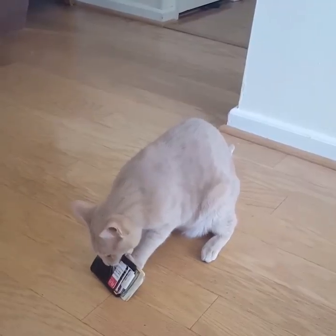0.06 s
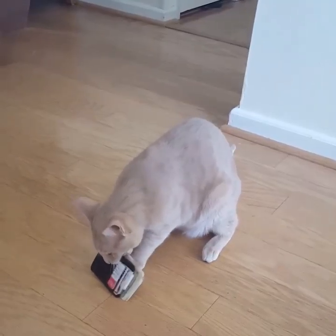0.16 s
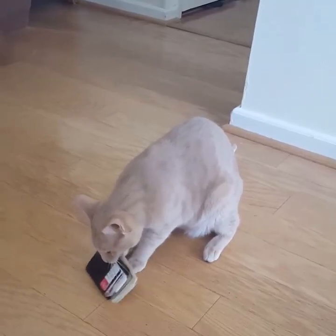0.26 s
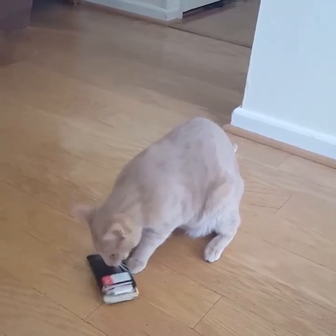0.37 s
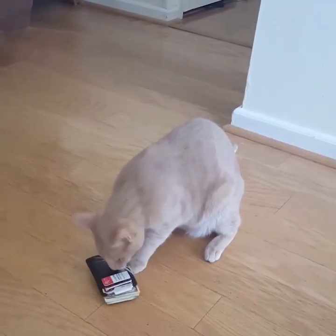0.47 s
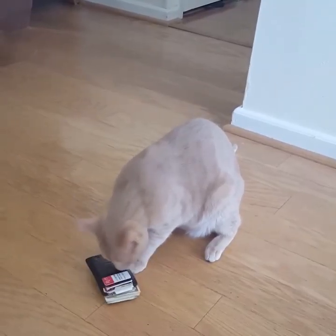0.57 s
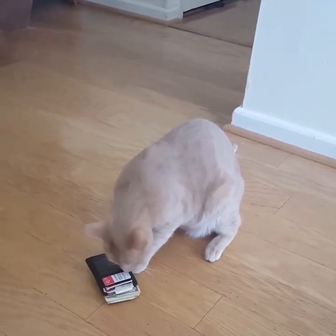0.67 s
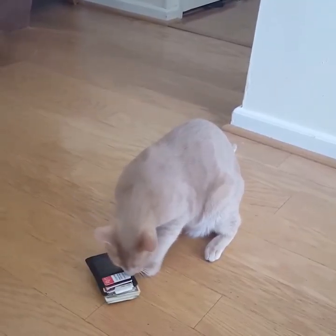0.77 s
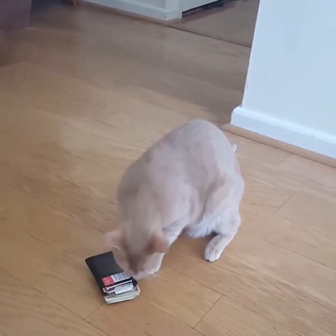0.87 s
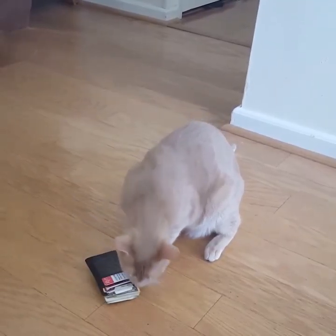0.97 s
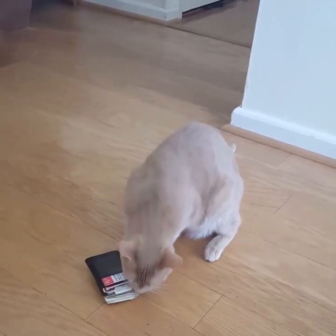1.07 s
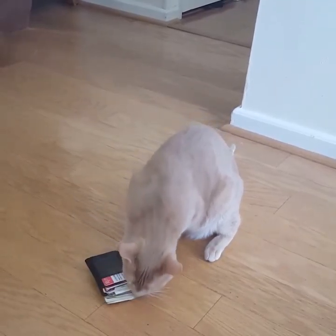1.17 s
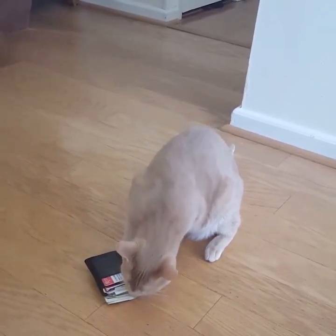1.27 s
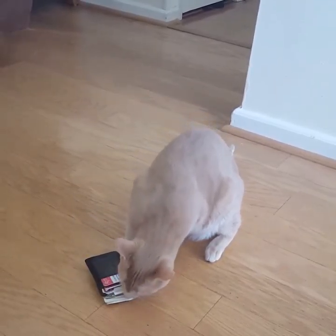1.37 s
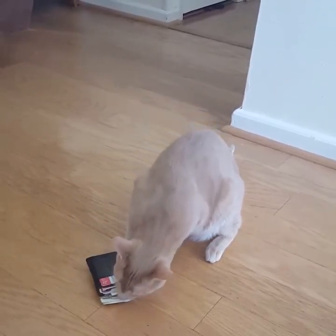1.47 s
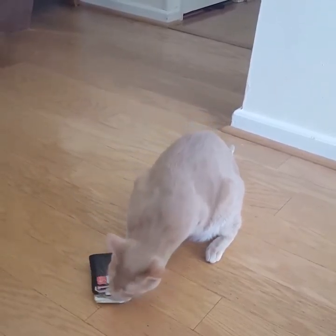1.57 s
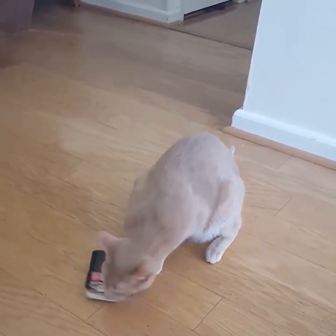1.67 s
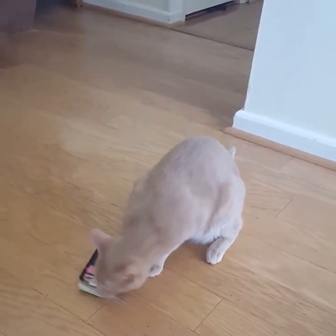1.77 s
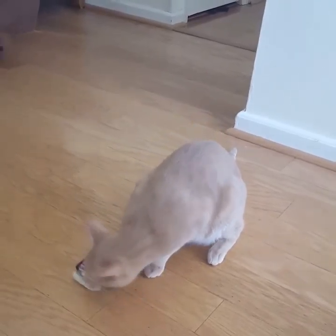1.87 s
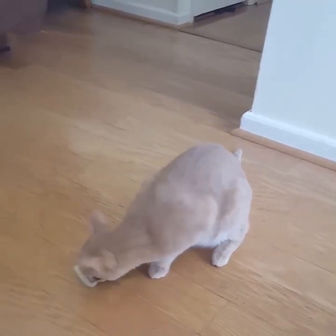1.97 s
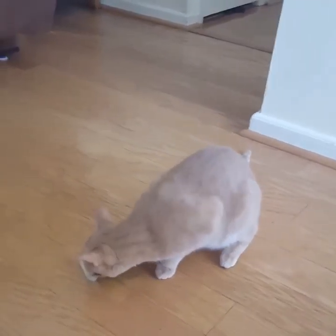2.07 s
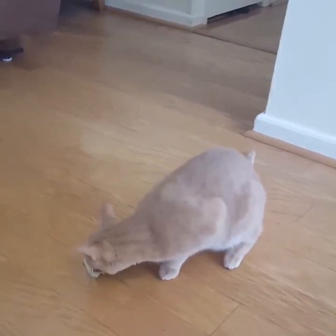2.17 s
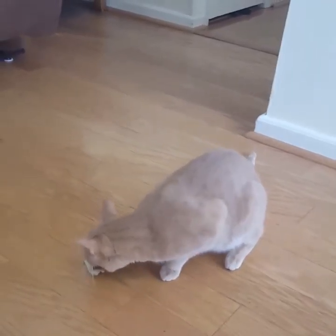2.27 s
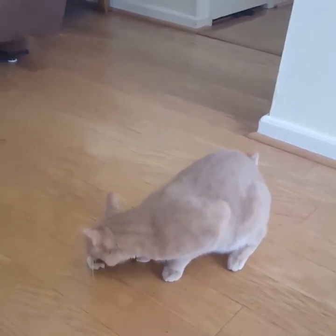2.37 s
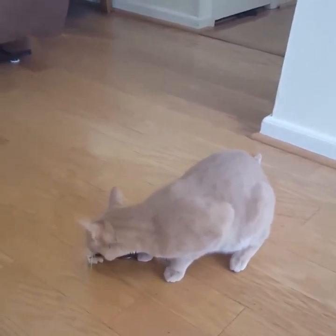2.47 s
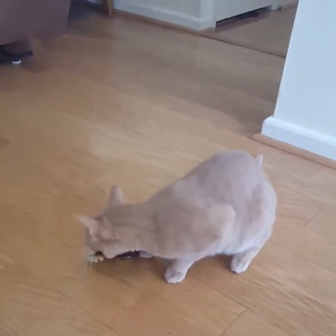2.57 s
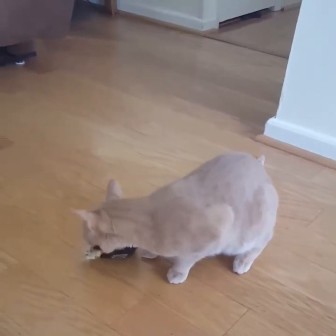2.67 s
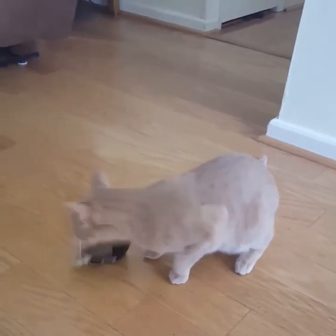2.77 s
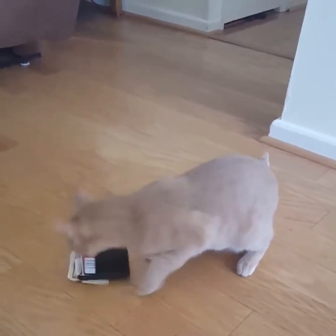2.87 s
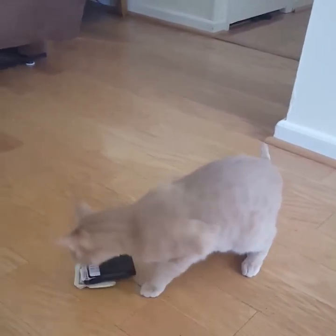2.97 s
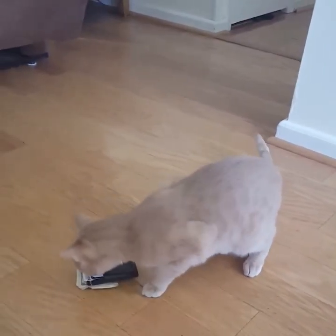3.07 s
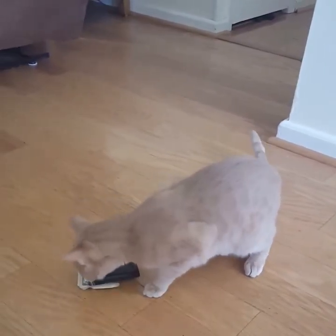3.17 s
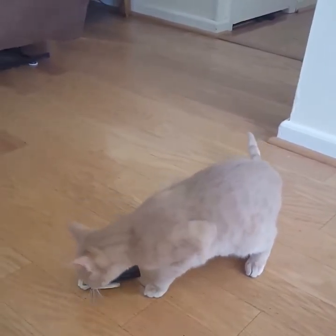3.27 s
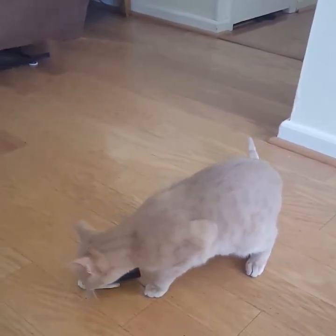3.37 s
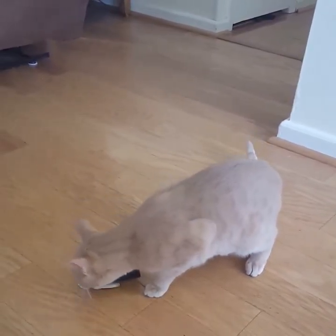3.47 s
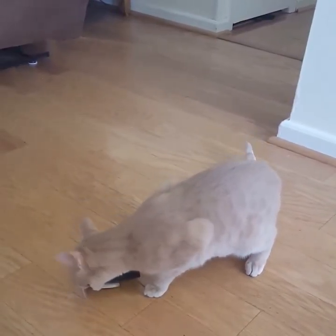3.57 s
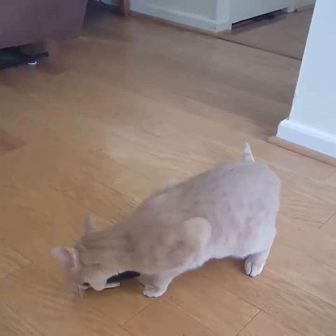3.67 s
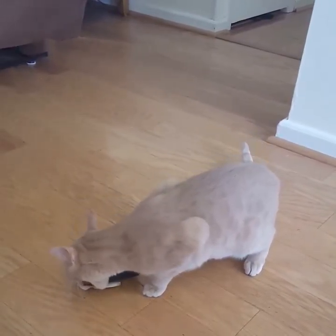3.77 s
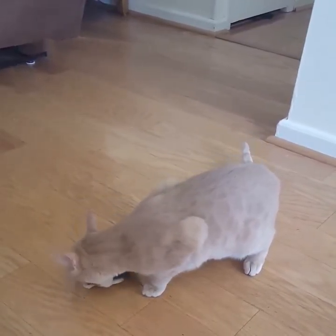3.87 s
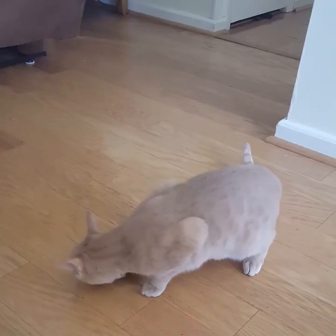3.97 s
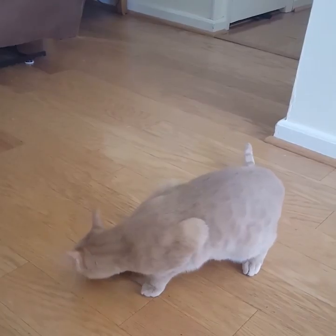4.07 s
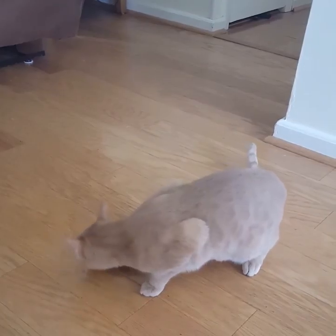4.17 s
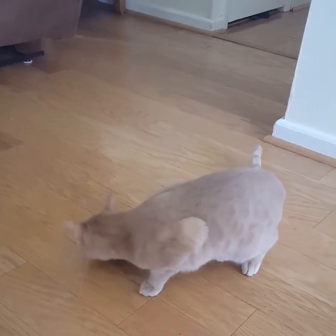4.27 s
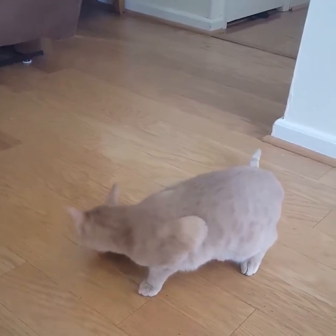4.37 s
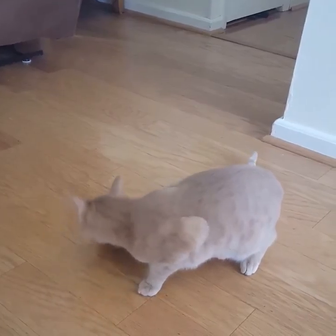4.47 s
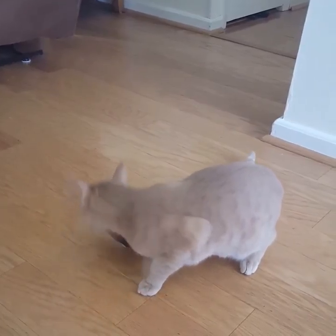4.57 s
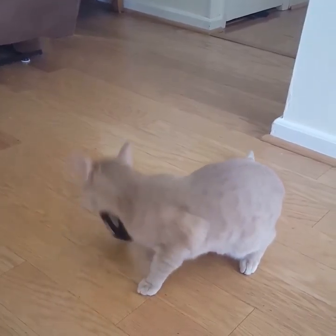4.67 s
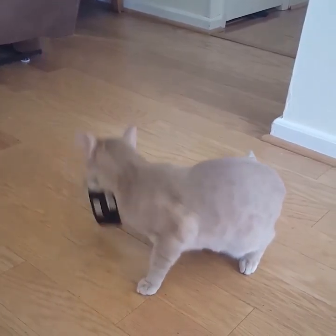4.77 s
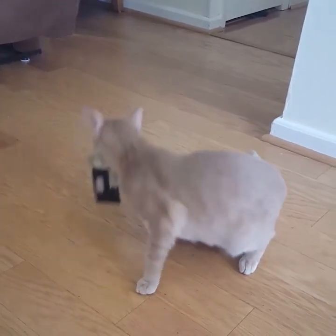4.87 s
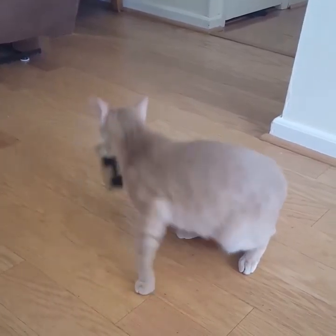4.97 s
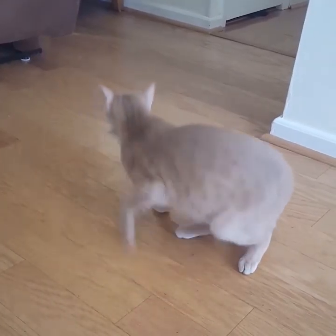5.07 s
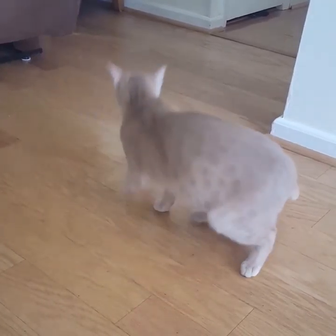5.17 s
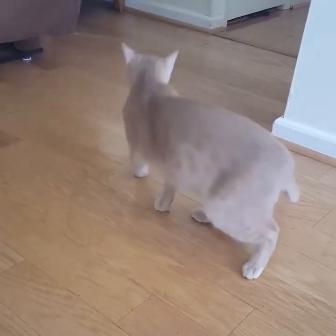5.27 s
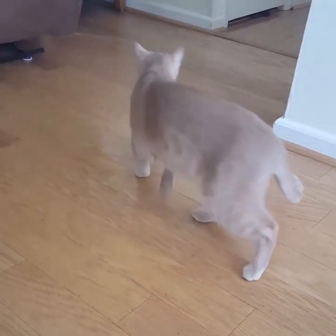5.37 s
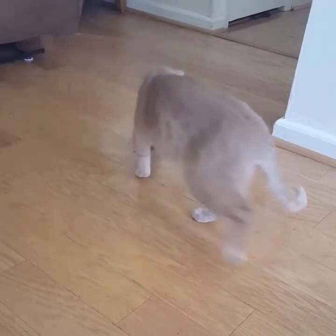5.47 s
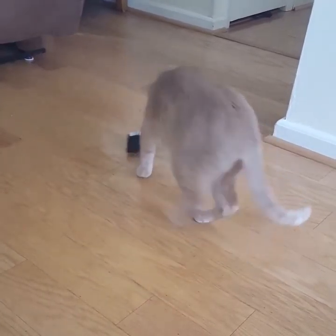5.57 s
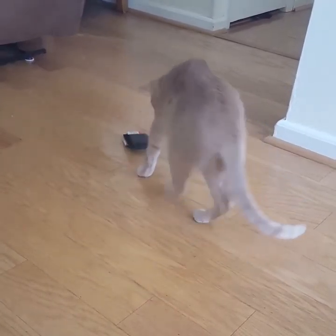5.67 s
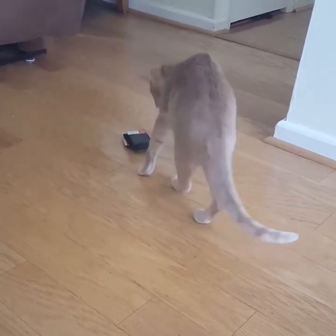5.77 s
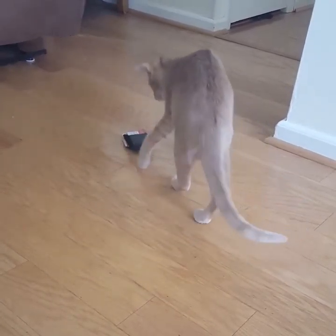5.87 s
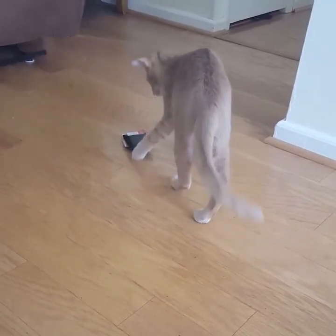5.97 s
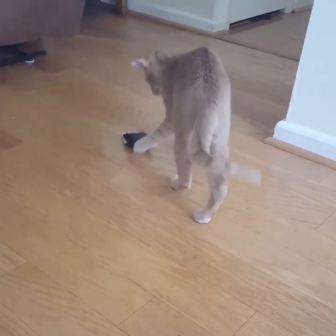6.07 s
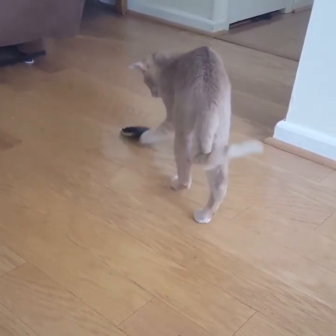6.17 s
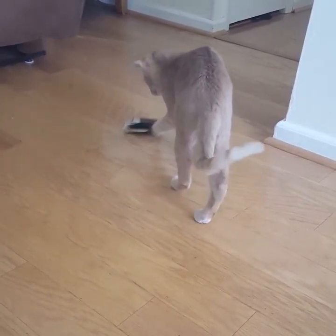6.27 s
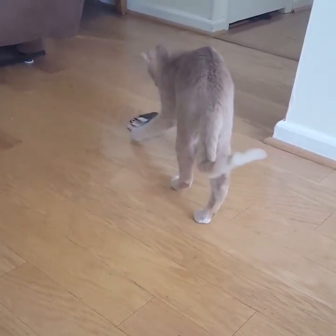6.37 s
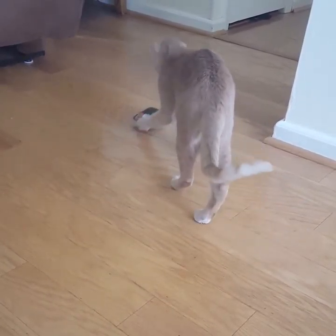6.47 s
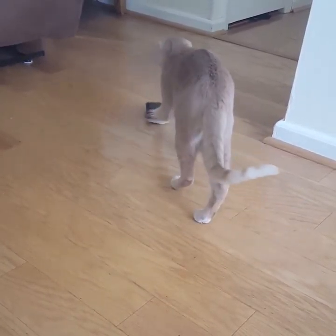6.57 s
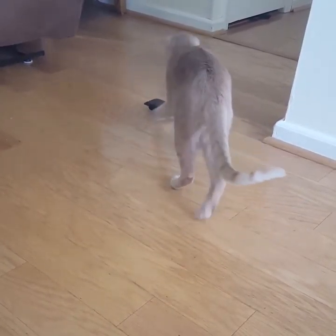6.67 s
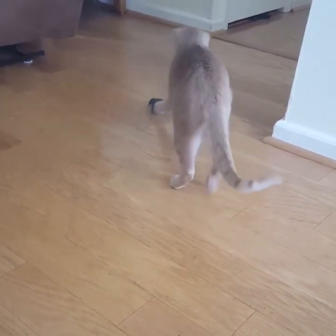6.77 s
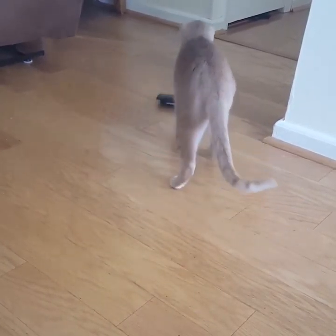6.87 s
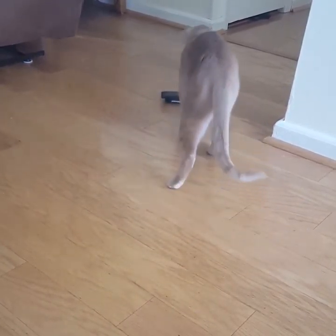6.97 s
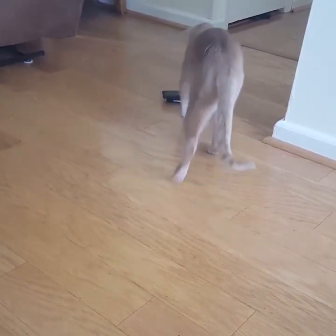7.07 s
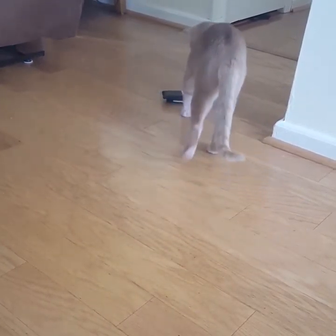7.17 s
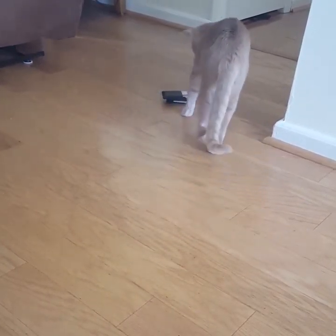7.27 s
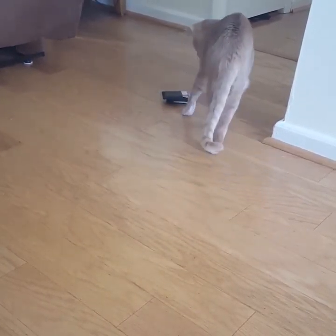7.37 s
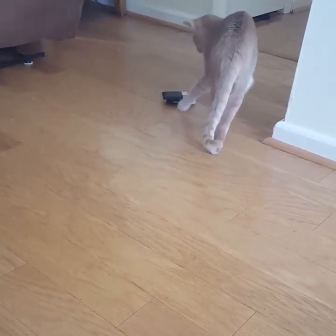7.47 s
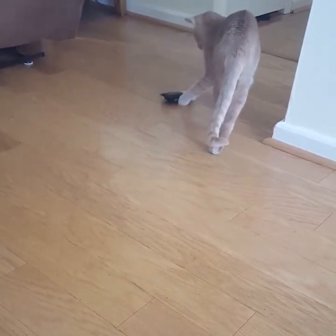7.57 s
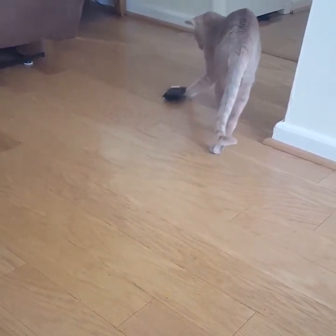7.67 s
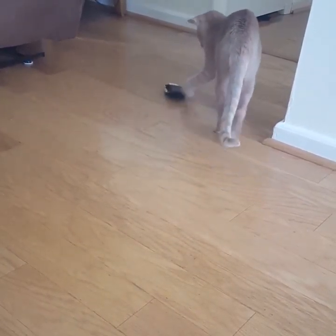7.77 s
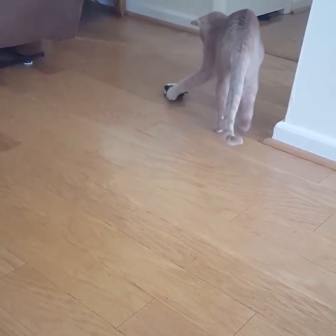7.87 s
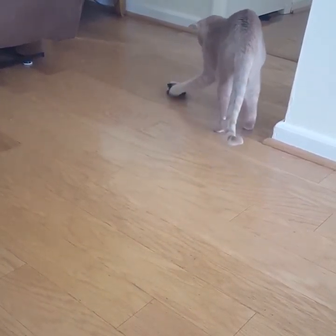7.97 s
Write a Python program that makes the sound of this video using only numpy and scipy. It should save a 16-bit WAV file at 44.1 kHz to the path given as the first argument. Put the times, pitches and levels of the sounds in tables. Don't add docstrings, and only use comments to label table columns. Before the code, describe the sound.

A wallet with stiff cards is pawed and dropped by a cat on wooden boards. One sharp clack comes early, then faint rubbing and tiny tooth clicks, a rattling drop, more quiet tugging, a loud clattering fall and finally scraping pushes with a low drone. A bare live room answers; a faint motor hum and hiss stay under it, on a phone microphone.

```python
import sys
import numpy as np
from scipy import signal
from scipy.fft import rfft, irfft
from scipy.io import wavfile
from scipy.ndimage import uniform_filter1d

SR = 44100
rng = np.random.default_rng(int(sys.argv[2]) if len(sys.argv) > 2 else 0)


def nominal_scale(level):
    x = np.asarray(level, float) / 20
    return 10 ** x


def int16_out(signal):
    q = np.round(np.clip(np.atleast_2d(signal).T, -1, 1) * 32767)
    wavfile.write(sys.argv[1], SR, q.astype(np.int16))


N = 354123

# pitch_hz, width_hz, level_db
WALLET_MODES = [(670, 31, 8.5), (1060, 360, -8), (1660, 450, -28), (3100, 79, -10), (3660, 170, -39),
                (5550, 35, -15)]
# pitch_hz, level_db (per Hz)
TICK_SPECTRUM = [(1200, -40), (2200, -25), (3000, 3.5), (3700, -6.5), (4400, -3.5), (6000, -7.5),
                 (7500, -14), (14000, -33)]


def knock(db, hz, tick_db, ring_db=-22.5):
    t = np.arange(1500) / SR - .004
    u = 2 * np.pi * hz * t
    push = (u + 0.11 * (1 - u ** 2)) * np.exp(.45 - u ** 2 / 2)

    tick = .3 * rng.standard_normal(len(t)) - 1.5 * (abs(t) < .6 / SR)
    tick *= np.exp(-abs(t) / .0004) * (t > -.0001)
    tick = coloured(tick, TICK_SPECTRUM) * (t > -.0006)

    ring = np.zeros(len(t))
    for mode_hz, width_hz, mode_db in WALLET_MODES:
        decay = np.exp(-np.pi * (width_hz + 60) * t)
        ring += nominal_scale(mode_db) * np.sin(2 * np.pi * mode_hz * t) * decay * (t > 0)
    ring = signal.oaconvolve(ring, push / np.abs(push).sum())
    ring = ring[round(-t[0] * SR):][:len(t)]
    return nominal_scale(db) * (push + nominal_scale(ring_db) * ring + nominal_scale(tick_db) * tick / abs(tick).max())


# start_s, peak_db, contact_pitch_hz, tick_db
LANDINGS = [(0.5979, -14, 1590, -13), (0.6206, -20.5, 1400, -23), (0.66, -26.5, 1300, -5),
            (0.6817, -24.5, 1630, -22), (0.701, -24, 1110, -34), (3.0187, -29, 470, -42),
            (3.0836, -18, 1480, -5), (3.0849, -15, 2160, -26), (3.0966, -14, 1390, -12.5),
            (3.1986, -18.5, 1740, -11), (3.2633, -25, 1710, -11), (5.6247, -25.5, 408, -17),
            (5.6371, -19.5, 545, -13), (5.642, -16, 500, -9), (5.6571, -12.5, 830, -7),
            (5.6596, -13, 2490, -16), (5.6621, -15.5, 785, 5.5), (5.6658, -11, 1650, -24),
            (5.6692, -11, 1560, -15), (5.8137, -13, 1590, -4.5), (5.9057, -17, 1760, -2.5),
            (6.4954, -27.5, 460, -4), (6.505, -29, 1550, -13), (6.5179, -31, 2010, -22),
            (6.5771, -25.5, 950, -24), (7.095, -22, 1080, -26), (7.1017, -21.5, 1340, -26),
            (7.1149, -27, 1080, -25), (7.1282, -30, 1090, -29)]
# start_s, peak_db, contact_pitch_hz, tick_db
NUDGES = [(0.4107, -40, 590, -6), (0.4151, -36.5, 780, -2), (1.8508, -52, 613, -14),
          (1.9274, -43, 1500, -6), (2.036, -38, 1250, -8), (2.1361, -37.5, 1080, -16),
          (2.1588, -32.5, 1430, -7.5), (2.1678, -55, 1280, -7), (2.9554, -45.5, 630, -10),
          (3.8674, -42.5, 860, -21), (4.0181, -43, 910, -7), (4.0419, -54, 880, -21), (4.129, -41, 900, -2),
          (4.1684, -37, 1600, -4), (4.2353, -38.5, 1080, -2.5), (4.2982, -40, 1170, -9),
          (4.33, -33.5, 1120, -6), (4.5005, -51, 2340, -8), (5.2122, -66, 780, -12),
          (5.4036, -63, 800, -13), (6.6915, -31.5, 1500, -9), (6.761, -34, 1200, -21),
          (7.9119, -27, 1120, -4), (7.9317, -24, 1450, -3)]
# middle_s,
# peak_db, pitch_hz, length_ms
CLICKS = [(0.4112, -38.5, 1900, .5), (0.4149, -47, 900, 1.1), (0.602, -24, 1700, 1.1),
          (0.6026, -31, 3120, 0.86), (0.6255, -31, 4300, 0.43), (0.7045, -31, 2310, 0.33),
          (1.8516, -49.5, 1070, 1.7), (2.009, -46, 700, 1), (2.1365, -43, 1000, 2), (2.165, -44, 2680, .8),
          (4.0195, -43.5, 1060, 2.9), (4.042, -47, 1090, 1.3), (4.173, -55, 3330, .6),
          (4.453, -46, 1500, .6), (4.507, -51, 4300, 1), (6.5047, -30, 3500, 0.21),
          (6.511, -28.5, 2280, 0.54), (6.542, -27, 1350, .8), (6.552, -28, 1000, 0.89),
          (6.579, -26, 3040, 0.17), (6.586, -30, 1500, 0.54), (6.77, -31, 1080, 1.3),
          (6.8125, -29, 1490, 0.46), (7.019, -33, 1550, 0.93), (7.109, -37, 4000, .3),
          (1.9265, -48.5, 4300, .8), (2.036, -40.5, 1470, 1.5), (2.4406, -48, 3650, 0.51),
          (2.4437, -47.5, 3500, 0.62), (2.4472, -52, 3700, 0.54), (2.71, -46, 3500, 0.46),
          (2.7103, -48, 7750, 0.35), (2.713, -48, 2200, .7), (2.7133, -46, 3580, .5),
          (2.7235, -60, 3780, .6), (3.0852, -17, 2080, 0.8), (3.0982, -27, 1870, 1.1),
          (3.1995, -22.5, 1820, 1.4), (3.199, -28, 4170, 0.88), (4.218, -45, 6400, .6),
          (4.501, -46, 4000, .6), (5.645, -36, 390, 2.4), (5.659, -35, 390, 3.9),
          (5.665, -11.5, 3220, 0.62), (5.9065, -34, 2230, 0.9), (6.498, -34.5, 540, 5),
          (6.577, -34, 1900, 1.9), (6.691, -40, 2600, 0.56), (7.0965, -27.5, 855, 2.5),
          (7.114, -29.5, 960, 2.3)]


def knocks():
    direct, sent = np.zeros((2, N + 1500))
    for rows, room_db in ((LANDINGS, 0), (NUDGES, 1.8)):
        for s, db, hz, tick_db in rows:
            at = round((s - .004) * SR)
            sound = knock(db, hz, tick_db)
            direct[at:at + len(sound)] += sound
            sent[at:at + len(sound)] += nominal_scale(room_db) * sound

    t = np.arange(-600, 600) / SR
    for s, db, hz, ms in CLICKS:
        at = round(s * SR) - 600
        click = nominal_scale(db) * np.sin(2 * np.pi * hz * t) * np.exp(-(t * 1000 / ms) ** 2)
        drier = hz > 3300 or db < -39
        direct[at:at + 1200] += click
        sent[at:at + 1200] += nominal_scale(-2 - 7 * drier) * click
    return direct[:N], sent[:N]


# start_s, length_s, rubbing_db, fizz_db (fur and leather)
SKIDS = [(.407, 0.035, -37, -48), (0.411, .012, -36, -47), (0.62, 0.025, -23.5, -42.5),
         (0.656, 0.072, -37, -49), (3.013, 0.096, -41.5, -49.5), (3.079, 0.084, -27, -46),
         (3.197, 0.039, -28, -45), (4.016, 0.17, -49, -73), (5.637, 0.13, -25, -41),
         (5.656, 0.061, -15.5, -35.5), (5.81, 0.068, -17.5, -38.5), (5.894, 0.18, -31, -54),
         (6.495, 0.19, -29, -64), (6.575, 0.05, -30.5, -49), (6.687, 0.092, -34.5, -53),
         (6.755, 0.17, -34, -52), (4.297, 0.11, -52, -66), (4.44, 0.059, -47, -66),
         (4.498, .03, -55, -51.5), (7.095, 0.2, -31, -48.5), (7.764, 0.37, -52, -69)]
# fastest_s, rise_s, fall_s, rubbing_db, fizz_db
PULLS = [(0.524, 0.06, 0.079, -50, -45.5), (1.95, 0.31, 0.3, -51.5, -63), (2.12, 0.36, 0.27, -51.5, -62.5),
         (2.256, 0.092, 0.19, -56, -62.5), (2.444, .02, .02, -58, -65), (2.64, 0.034, 0.13, -59, -67),
         (2.708, .01, 0.06, -66, -56), (2.85, .03, .03, -74, -73), (3.872, .025, 0.028, -54, -78),
         (4.185, 0.05, 0.051, -51.5, -62), (4.14, .015, .05, -48, -63), (4.235, 0.12, .15, -61, -56.5),
         (4.36, 0.092, 0.088, -49.5, -64), (4.518, 0.58, 0.068, -54, -63), (6.33, 0.063, 0.67, -56.5, -52),
         (6.47, 0.24, 0.075, -47.5, -51), (6.675, 0.046, 0.024, -50, -56), (6.79, 0.061, 0.19, -40, -51.5),
         (6.73, .04, 0.046, -37, -61), (6.95, 0.23, 0.16, -42, -56), (7.055, 0.076, 0.07, -32, -51.5),
         (7.901, 0.13, 0.023, -43, -47.5), (7.928, 0.034, 0.085, -39, -42)]


def motion():
    t = np.arange(0, N / SR + .001, .001)
    power = np.full((2, len(t)), 1e-20)
    haste = np.array([[1], [0.88]])
    for s, length, rub_db, fizz_db in SKIDS:
        onset = np.clip((t - s) / 0.0011, 0, 1)
        fade_db = -19 * np.maximum(t - s, 0) / length * haste
        power += (onset * nominal_scale(fade_db + [[rub_db], [fizz_db]])) ** 2
    for s, rise, fall, rub_db, fizz_db in PULLS:
        away = abs(t - s) / np.where(t < s, rise, fall)
        power += nominal_scale(-17 * away ** 1.27 + [[rub_db], [fizz_db]]) ** 2
    return [np.interp(np.arange(N) / SR, t, np.sqrt(p)) for p in power]


def grit(per_s, spread_db, share):
    size = nominal_scale(spread_db * np.minimum(rng.exponential(1, N), 2.6))
    slips = (rng.random(N) < per_s / SR) * rng.standard_normal(N) * size
    return share * evened(slips) + rng.standard_normal(N)


# pitch_hz, level_db (per Hz)
RUB_SPECTRUM = [(150, -18), (300, -13), (560, -2.5), (900, 3), (1600, 0.5), (2500, -1), (3500, -6),
                (4200, -11.5), (6500, -17.5), (9000, -66)]
# pitch_hz, level_db (per Hz)
FIZZ_SPECTRUM = [(1500, -12), (3000, 0.5), (5000, 4.5), (8000, 2), (10500, 1), (13000, 4.5), (14600, 0),
                 (14900, -29)]
# start_s, length_s, pitch_hz, share, width_hz
SINGS = [(2.04, .1, 2080, 1.1, 300), (1.93, 0.045, 4250, .3, 400), (2, 0.026, 2400, 1.2, 600),
         (4.3, 0.075, 1160, 1.1, 250), (4.17, 0.034, 1850, 1.1, 370), (2.301, 0.15, 2200, 2, 81),
         (4.196, 0.075, 2370, 1.5, 200), (4.3, 0.074, 1900, 1, 260), (4.45, 0.08, 2300, 1.1, 390),
         (3.093, 0.069, 1600, 1.3, 390), (3.13, 0.065, 2240, 2.1, 540), (3.2, .1, 1600, 1.2, 500),
         (5.67, 0.13, 3240, 0.91, 360), (0.59, .13, 3060, 0.78, 490), (5.815, 0.044, 1500, 0.62, 600),
         (5.908, 0.043, 2260, 1.2, 600), (5.94, 0.083, 2150, 1.2, 420), (6.7, 0.092, 1700, 0.62, 530),
         (6.737, 0.12, 2100, 0.53, 610), (6.72, 0.21, 1270, 0.53, 390), (3.018, 0.058, 490, 1.7, 250),
         (5.91, .1, 940, 0.47, 560), (7.01, 0.1, 1550, 1.3, 400), (7.095, 0.12, 1500, 0.73, 560)]


def scrape():
    rub_level, fizz_level = motion()
    catch = drift(150.)
    boards = coloured(grit(700., 0.62, 0.36), RUB_SPECTRUM)
    edge = 0.27 * evened(resonate(boards, 1830 + 69 * drift(4.2), 360.0))
    for s, length, hz, share, width_hz in SINGS:
        span = slice(round(s * SR), round((s + length) * SR))
        swell = np.hanning(len(edge[span])) ** 0.33
        edge[span] += share * swell * evened(resonate(boards[span], hz, width_hz))

    on_loose_board = np.arange(N) > 6.45 * SR
    edge += 0.56 * on_loose_board * evened(resonate(boards, 244, 17.5))
    rub = rub_level * nominal_scale(1.5 * catch - 11.0) * (boards + edge)
    fizz = fizz_level * nominal_scale(1.4 * catch - 4.0) * coloured(grit(1500., 3.5, 0.54), FIZZ_SPECTRUM)
    return rub, fizz


def walls(x, echoes):
    early = np.zeros(1000)
    for s, db in echoes:
        early[round(s * SR)] = nominal_scale(db)
    return signal.oaconvolve(x, early)[:N]


# delay_s, level_db
ECHOES = [(.0011, -5.5), (.0039, 2), (.0049, -4.5), (.0097, -13), (0.012, 1)]
# delay_s, level_db
FAR_ECHOES = [(.0021, -2), (.0034, -28), (.0062, -41), (.0088, -2), (0.0139, 1)]
# pitch_hz, t60_s
ROOM_T60 = [(250, 0.62), (660, 0.52), (1740, 0.53), (4600, 0.42), (10000, 0.55)]
# pitch_hz, level_db
FURNISHING = [(200, -6), (500, -1), (1000, -0.5), (2000, -0.5), (3500, 2.5), (6000, 0.5), (12000, -3.5)]


def room(x):
    out = np.zeros(N)
    turn = np.arange(N) / SR * 7.0
    far = np.arange(N) > 5.5 * SR
    for k in range(3):
        taps = np.zeros(SR)
        at = np.arange(0, SR - 20, 12)
        taps[at + rng.integers(0, 12, len(at))] = rng.choice([-1., 1.], len(at))
        hz, t, z = signal.stft(taps, SR, nperseg=256)
        decay_db = read(FURNISHING, hz)[:, None] - 60 * t / read(ROOM_T60, hz)[:, None]
        tail = signal.istft(z * nominal_scale(decay_db), SR, nperseg=256)[1]
        tail *= 1 - np.exp(-np.arange(len(tail)) / SR / 0.0011)
        feed = np.sqrt(2 / 3) * np.cos(np.pi * (turn + k / 3))
        out += signal.fftconvolve(x * feed, tail / np.linalg.norm(tail))[:N]
    early = walls(x * ~far, ECHOES) + walls(x * far, FAR_ECHOES)
    return nominal_scale(0.5) * out + nominal_scale(-11.0) * early


# pitch_hz, level_db (rms), wavering_share, wavering_hz
MOTOR_ORDERS = [(118.4, -68, 1.1, 4.0), (177.0, -61, .9, 9.0), (236.9, -61, 1.2, 12.0),
                (296.1, -62.5, .7, 7.0), (355.3, -72, .8, 4.0), (597.5, -78, .8, 3.0), (1362, -83, .4, 2.5),
                (1126.5, -69, .12, 3.0), (1186, -72, .15, 3.0), (8629, -100, .3, 3.0)]


def hum():
    turn = 2 * np.pi * np.arange(N) / SR
    out = np.zeros(N)
    for hz, db, share, waver_hz in MOTOR_ORDERS:
        in_phase = (1 + share * drift(waver_hz)) * np.cos(hz * turn)
        quadrature = share * drift(waver_hz) * np.sin(hz * turn)
        out += nominal_scale(db) * evened(in_phase + quadrature)
    return out


# pitch_hz, level_db (per Hz)
AIR_SPECTRUM = [(20, -25), (27, -20.5), (70, -4), (129, -7), (146, -11.5), (170, -5), (239, 0), (330, -10),
                (428, -14), (1040, -20.5), (1270, -24), (2150, -29), (10800, -42), (13000, -40)]


def air():
    return nominal_scale(-54.5 + 1.1 * drift(7.1)) * coloured(rng.standard_normal(N), AIR_SPECTRUM)


def evened(x):
    return x / np.sqrt(np.mean(x ** 2) + 1e-20)


def read(points, hz):
    f, value = np.transpose(points)
    return np.interp(np.log(hz + 1), np.log(f + 1), value)


def coloured(x, spectrum):
    gain = nominal_scale(read(spectrum, np.fft.rfftfreq(len(x), 1 / SR)))
    return evened(irfft(rfft(x) * gain, len(x)))


def drift(width):
    r = np.exp(-np.pi * width / SR)
    return evened(signal.lfilter([1], [1, -2 * r, r * r], rng.standard_normal(N)))


def resonate(x, hz, width):
    turn = np.exp(2j * np.pi * np.cumsum(hz * np.ones(len(x))) / SR)
    r = np.exp(-np.pi * width / SR)
    return 2 * (turn * signal.lfilter([1 - r], [1, -r], x / turn)).real


def scene():
    direct, sent = knocks()
    rub, fizz = scrape()
    sent = sent + nominal_scale(-4.0) * rub + nominal_scale(-19.0) * fizz
    return (direct + rub + fizz + room(sent) + hum() + air())[None]


def band_limit(x):
    return signal.sosfilt(signal.butter(12, 15710, fs=SR, output="sos"), x)


# start_s, end_s, pitch_hz
WHISTLES = [(.6, .637, 12936), (.658, .95, 12936), (6.5, 6.62, 9938), (.7, 1.17, 11440), (.6, 1.08, 9938),
            (2.16, 3.6, 12936), (2.16, 2.28, 12188), (3.09, 3.195, 12188), (3.265, 3.345, 12188),
            (3.09, 3.6, 11440), (3.09, 3.42, 9189), (4.33, 5.18, 12188), (4.33, 4.87, 10686),
            (4.33, 4.45, 11440), (5.665, 5.92, 12188), (6.075, 6.29, 12188), (5.81, 6.16, 12936),
            (5.638, 5.655, 12936), (5.665, 5.78, 10686), (5.81, 6.035, 10686), (5.81, 5.9, 11440),
            (5.905, 6.27, 9189), (6.5, 7.18, 12936), (6.5, 6.8, 12188), (7.1, 8.03, 12188),
            (6.6, 7.43, 11440), (6.5, 7.38, 10686), (7.1, 7.18, 9938)]
# start_s, end_s, low_hz, high_hz, level_db
SLOTS = [(.575, .595, 8500, 14750, -8), (.617, .637, 10300, 12300, -22), (.617, .657, 13300, 15700, -22),
         (.64, .657, 8000, 13300, -12), (.66, .72, 14750, 15700, 14), (.72, .785, 11600, 12700, -15),
         (.745, 1.1, 10300, 12000, -10), (.75, .82, 7700, 8250, -18), (6.29, 6.47, 10300, 14750, -4),
         (6.51, 6.545, 10200, 11200, -15), (6.6, 6.65, 9400, 11000, -10), (6.715, 6.78, 10500, 14500, -6),
         (3.01, 3.065, 14750, 15700, 14), (3.05, 3.08, 10900, 11500, -20), (3.09, 3.1, 10000, 12000, -20),
         (3.1, 3.19, 10000, 11000, -22), (3.09, 3.195, 14200, 15700, -20), (3.1, 3.19, 6600, 7000, -12),
         (3.22, 3.43, 10300, 11200, -22), (3.22, 3.385, 11700, 12600, -15), (3.305, 3.37, 7800, 8200, -18),
         (5.635, 5.66, 14750, 15700, 14), (5.66, 5.77, 11000, 11800, -25),
         (5.665, 5.765, 14750, 15700, -15), (5.735, 5.775, 9500, 10400, -15),
         (5.77, 5.825, 14750, 15700, 14), (5.83, 5.88, 13800, 15700, -20), (5.95, 6.03, 10900, 11500, -18),
         (6.035, 6.075, 10300, 13500, -8), (6.05, 6.12, 10200, 10700, -15), (7.015, 7.055, 7700, 8150, -18),
         (7.065, 7.077, 9600, 14700, -10), (7.11, 7.44, 10900, 11800, -15), (7.185, 7.4, 10200, 11000, -15),
         (7.19, 7.44, 11800, 12500, -10)]


def record(dry):
    hz, t, z = signal.stft(0.46 * np.tanh(dry[0] / 0.44), SR, nperseg=512, noverlap=384)
    z[hz > 15700] = 0
    z[hz > 14750] *= nominal_scale(-15.0)
    loud = uniform_filter1d((abs(z) ** 2).sum(0), size=16) / nominal_scale(-52.5) ** 2
    z[hz > 10200] /= (1 + loud) ** 0.14

    whistles = np.zeros(N)
    clock = np.arange(N) / SR
    for start, end, slot_hz in WHISTLES:
        slot = abs(hz - slot_hz) < 420
        on = (t > start) & (t < end)
        level = np.sqrt(uniform_filter1d((abs(z[slot]) ** 2).sum(0), size=8)) * on
        whistles += nominal_scale(0.5) * np.interp(clock, t, level) * np.sin(2 * np.pi * slot_hz * clock)
        z[np.ix_(slot, on)] *= nominal_scale(-10.0)
    for start, end, low, high, slot_db in SLOTS:
        z[np.ix_((hz > low) & (hz < high), (t > start) & (t < end))] *= nominal_scale(slot_db)
    mix = signal.istft(z, SR, nperseg=512, noverlap=384)[1][:N] + whistles - .0005
    return band_limit(mix[None])


dry = scene()
out = record(dry)
int16_out(out)
```